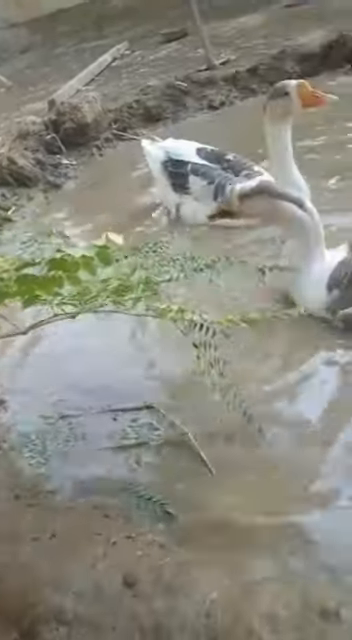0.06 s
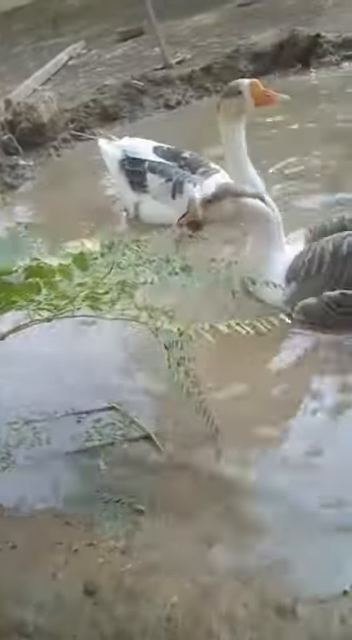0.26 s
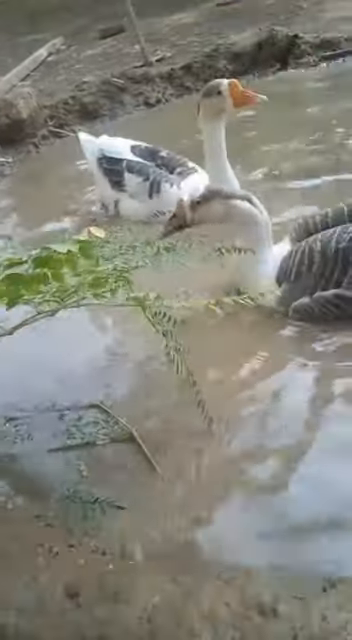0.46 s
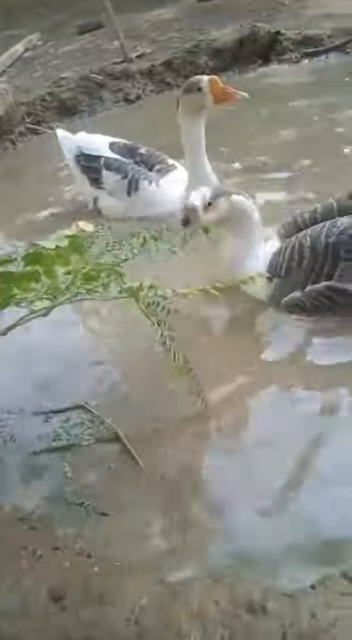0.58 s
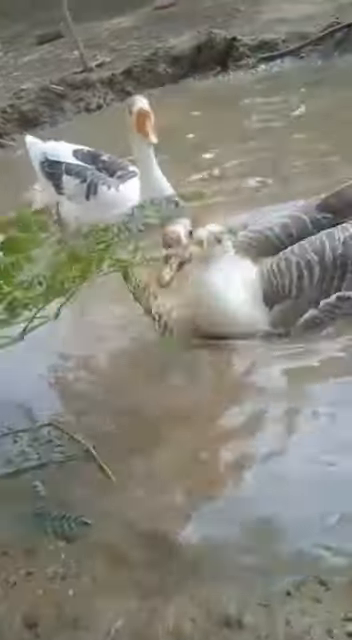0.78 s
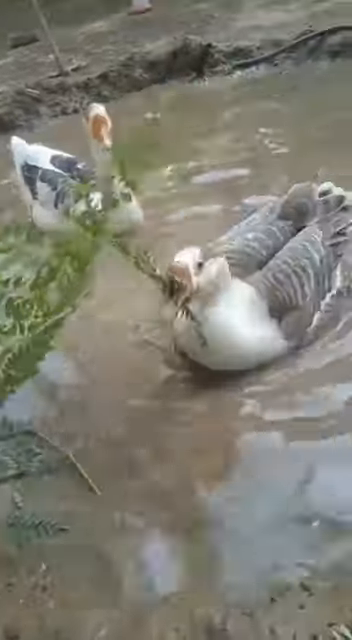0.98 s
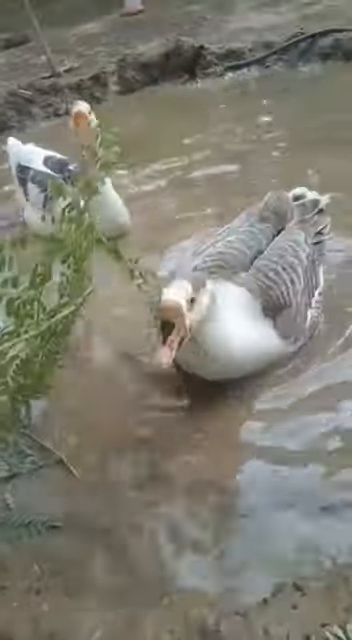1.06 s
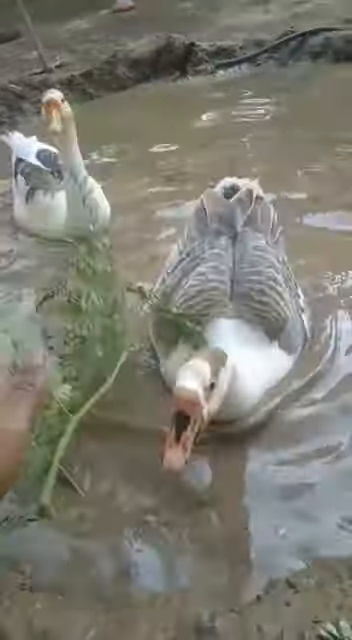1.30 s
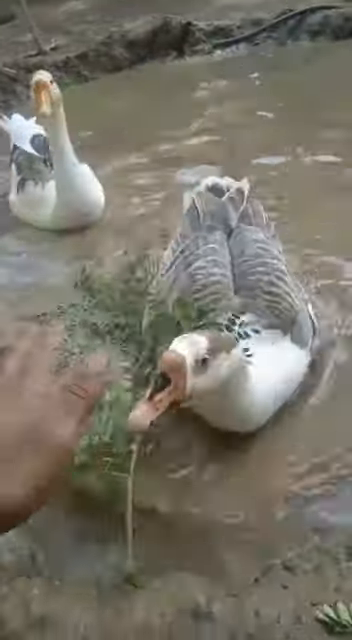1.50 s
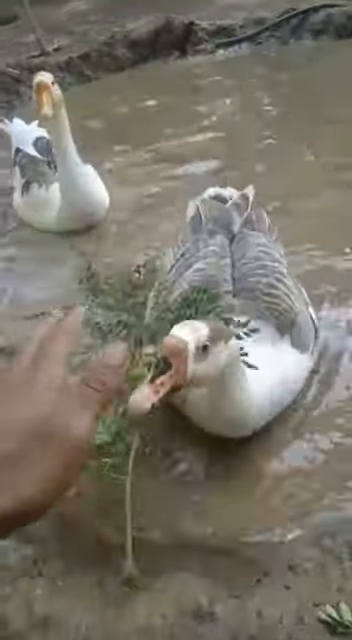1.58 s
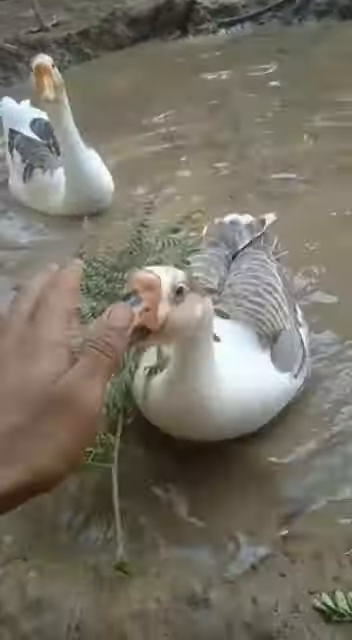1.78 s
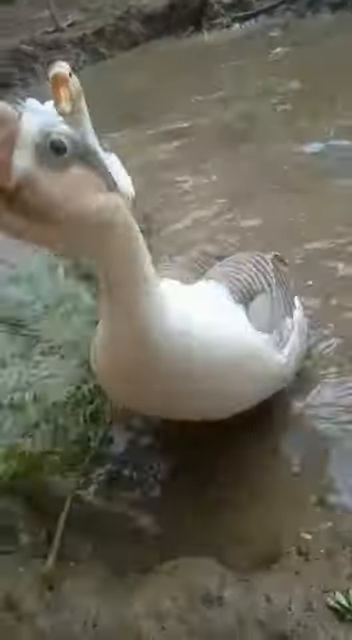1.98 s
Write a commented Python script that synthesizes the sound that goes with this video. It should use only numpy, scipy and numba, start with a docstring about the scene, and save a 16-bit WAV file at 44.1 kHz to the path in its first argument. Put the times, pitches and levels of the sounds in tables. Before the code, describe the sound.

A goose honks once, close and loud, from about 0.22 to 0.62 seconds: rattling onset, clear nasal note rising from roughly 880 to 1000 hertz, turning raspy, then dropping off. A soft grunt and leaf rustle precede it. Faint laps follow around 0.8 to 1.1, light leaf rustles to the end, twig ticks near 1.5 and 2.04. A distant engine rumbles under soft outdoor noise, with faint bank echo.

```python
"""A goose honks once, close by on a muddy pond: a rattling start, a clear nasal note that turns harsh, a short fall.
The note is a stack of harmonics with a beating second vibration and rasp; flaps ringing the throat add rattle.
A tugged leafy branch rustles and ticks in shaped noise; a soft grunt and low laps of the pond are resonant noise.
The banks echo faintly; behind lie a distant engine's wavering sine orders over a noise rumble, and soft,
flickering outdoor noise."""
import sys
import numpy as np
from scipy import signal
from scipy.fft import rfft, irfft
from scipy.io import wavfile
from scipy.ndimage import uniform_filter1d
from numba import njit

SR = 44100
rng = np.random.default_rng(int(sys.argv[2]) if len(sys.argv) > 2 else 0)


def put_to_file(sound):
    """Save the sound as 16-bit audio at rate SR, in the file named by the first command-line argument."""
    columns = np.atleast_2d(sound).T  # one column per channel
    safe = np.clip(columns, -1, 1)
    whole_steps = np.round(safe * 32767)
    wavfile.write(sys.argv[1], SR, whole_steps.astype(np.int16))


N = 90404

# Pitch of the honk. Each row: time in seconds, pitch in Hz.
HONK_PITCH = [(.23, 879), (.28, 850), (.305, 885), (.345, 885), (.357, 924), (.387, 973), (.41, 978),
              (.45, 968), (.478, 970), (.503, 1024), (.539, 1008), (.575, 975), (.595, 958), (.605, 915),
              (.616, 820)]
# Clear note. Each row: time in seconds, base level in dB, extra bass in dB, extra treble at full weight in dB.
NOTE_LEVELS = [(.22, -67, -16, -23), (.245, -63.5, -7, -5), (.27, -68.5, -1.5, -24), (.283, -56, 5.5, -29),
               (.305, -52, 3.5, -4), (.34, -49.5, -6.5, -23.5), (.362, -48.5, 1.5, -24.5),
               (.38, -41, -0.5, -23), (.40, -35.5, -1, -3), (.43, -38.5, 0.5, 3.5), (.475, -41, 2, -4),
               (.505, -35.5, -0.5, -5), (.54, -38.5, -3, -8.5), (.572, -43.5, 6, 9), (.594, -47.5, 2.5, 10),
               (.603, -57, 10, 16), (.614, -67.5, 12, -2)]
# Rattle bursts in the throat. Each row: start in seconds, length in seconds, flaps per second, level in dB,
# place of the strongest flap (0-1), fall away from it in dB, sway of the note (0-1).
RATTLE_BURSTS = [(0.236, 0.035, 180, -54.5, 0.86, 4.5, 0.4), (.2822, 0.041, 149, -47, 0.6, 3.5, 0.4),
                 (.4002, 0.032, 140, -48, 0.13, 4, 0.18), (.4675, 0.021, 162, -55.5, 1, 7, 0.14),
                 (.5028, 0.011, 170, -41, 0.23, 5.5, 0.48), (.5238, .04, 175, -46, 0.07, 8, 0.16)]


def undb(db):
    """Decibels to amplitude."""
    return 10 ** (np.asarray(db) / 20)


def unit(x):
    """Scale to rms 1."""
    return x / np.sqrt(np.mean(x ** 2))


def curve(rows, axis=1):
    """One column of a table, joined by straight lines in time."""
    rows = np.array(rows, float)
    return np.interp(np.arange(N) / SR, rows[:, 0], rows[:, axis])


def fade(rows):
    """Gate open from the first to the last row of a table, with 10 ms ramps outside."""
    t = np.arange(N) / SR
    inside_s = np.minimum(t - rows[0][0], rows[-1][0] - t)
    return np.clip(inside_s * 100 + 1, 0, 1)


def walk(steps_per_s):
    """Smooth random drift with spread near 1: held random steps, averaged twice."""
    step = max(int(SR / steps_per_s), 1)
    held = np.repeat(rng.standard_normal(N)[:N // step + 1], step)
    smooth = uniform_filter1d(uniform_filter1d(held, step), step)
    return 1.3 * smooth[:N]


def colour(x, points):
    """Shape a spectrum by (Hz, dB) points joined over log frequency; rms 1."""
    hz, db = np.array(points, float).T
    bin_hz = np.maximum(np.arange(N // 2 + 1) * SR / N, 1)
    gain = undb(np.interp(np.log(bin_hz), np.log(hz), db))
    return unit(irfft(rfft(x) * gain, N))


def turns(hz):
    """Running phase in radians."""
    return 2 * np.pi * np.cumsum(hz) / SR


def decay(x, time_s):
    """Start an exponential decay at each impulse."""
    return signal.lfilter([1], [1, -np.exp(-1 / (time_s * SR))], x)


@njit
def resonance(x, hz, width):
    """Band-pass state-variable filter with a moving centre; width in Hz."""
    out, band, low = np.empty(len(x)), 0., 0.
    for i in range(len(x)):
        g, damping = np.tan(np.pi * hz[i] / SR), width / hz[i]
        v = (band + g * (x[i] + 1e-18 - low)) / (1 + g * (g + damping))
        band = 2 * v - band
        low = low + 2 * g * v
        out[i] = damping * v
    return out


def ring(x, hz, stage_width_hz, order=3):
    """A steep resonance of cascaded band-passes; rms 1."""
    for _ in range(order):
        x = resonance(x, hz * np.ones(N), 1. * stage_width_hz)
    return unit(x)


def goose():
    """The harsher the voice, the less steady its pitch; flaps locked to the note sway it and ring the throat."""
    pitch_jitter, harsh_jitter = 0.0026, 0.012  # pitch shares; the second per unit of rasp over note
    # Air through the open bill. Each row: time in seconds, level in dB.
    rasp_rows = [(.35, -76.5), (.385, -62.5), (.41, -60.5), (.45, -69), (.48, -57), (.505, -53), (.54, -54),
                 (.57, -66), (.60, -59.5), (.615, -67.5)]
    note_level = undb(curve(NOTE_LEVELS))
    rasp_level = undb(curve(rasp_rows)) * fade(rasp_rows)
    harsh = np.minimum(rasp_level / note_level, .5)
    steady_pitch = curve(HONK_PITCH)
    pitch = steady_pitch * (1 + pitch_jitter * walk(300) + harsh_jitter * harsh * walk(900))
    phase = turns(pitch)
    clicks, sway = flaps(phase)
    voice = clear_note(note_level, pitch, phase) + second_vibration(note_level, pitch, phase)
    voice = voice * fade(NOTE_LEVELS)
    return (voice + rasp(rasp_level, phase)) * (1 + sway) + rattle(steady_pitch, clicks)


def clear_note(level, pitch, phase):
    """Shimmering harmonics coloured by the throat and by a bill resonance that rises and sinks."""
    harmonic_count, treble_hz, bill_sigma_hz, shimmer_db = 14, 3380, 444, 1.97
    # Throat colour of the harmonics. Each row: frequency in Hz, gain in dB.
    throat_colour = [(850, 5.5), (1000, -8), (1750, 4.5), (2000, 0), (2660, -12), (2900, -21), (3400, -33),
                     (3900, -18.5), (4850, -31.5), (5850, -46.5), (6900, -41.5), (7800, -41.5), (9000, -54),
                     (10300, -52.5), (12000, -52), (13800, -56)]
    # Bill resonance. Each row: time in seconds, centre in Hz, level in dB.
    bill_rows = [(.345, 5370, -74), (.375, 5860, -67.5), (.40, 6280, -57), (.43, 6140, -57),
                 (.465, 5720, -56.5), (.505, 6000, -70), (.535, 6100, -67.5), (.56, 5920, -58.5),
                 (.595, 5660, -50), (.61, 5670, -64)]
    colour_hz, colour_db = np.array(throat_colour, float).T
    bass_db, treble_db = curve(NOTE_LEVELS, axis=2), curve(NOTE_LEVELS, axis=3)
    bill_hz = curve(bill_rows)
    bill_level = undb(curve(bill_rows, axis=2)) * fade(bill_rows)
    note = 0
    for k in range(1, harmonic_count + 1):
        hz = k * pitch
        throat_db = np.interp(hz, colour_hz, colour_db)
        treble_weight = np.clip(2 * (hz / treble_hz - 1) + 0.32, 0, 1)
        extra_db = bass_db if k == 1 else treble_weight * treble_db
        bill = bill_level * np.exp(-.5 * ((hz - bill_hz) / bill_sigma_hz) ** 2)
        shimmer = undb(shimmer_db * np.sqrt(k / 2) * walk(89.0))
        note = note + (level * undb(throat_db + extra_db) + bill) * shimmer * np.sin(k * phase)
    return note


def second_vibration(level, pitch, phase):
    """A lower vibration beats with the note, placing side tones above or below its harmonics."""
    # Lower vibration. Each row: time in seconds, share of the pitch, depth in dB.
    second_rows = [(.35, .68, -16.5), (.385, .655, -9.5), (.415, .595, -16.5), (.475, .585, -11.5),
                   (.497, .665, -9), (.53, .675, -10), (.56, .69, -13), (.58, .78, -20), (.598, .79, -2)]
    # Each row: harmonic, side (+1 above, -1 below), level in dB.
    side_tones = [(0, 1, -3), (1, 1, -9.5), (2, 1, -6.5), (3, -1, -7), (3, 1, -24.5), (5, -1, -33.5),
                  (6, 1, -33)]
    lower_phase = turns(pitch * curve(second_rows) * (1 + 0.012 * walk(200)))
    beat = 0
    for k, side, db in side_tones:
        beat = beat + undb(db + 2.8 * walk(100.6)) * np.sin(k * phase + side * lower_phase)
    return level * undb(curve(second_rows, axis=2)) * fade(second_rows) * beat


def rasp(level, phase):
    """Turbulent air through the open bill, pulsing fully with each cycle of the note."""
    # Each row: frequency in Hz, spectral density in dB per Hz.
    rasp_colour = [(400, -47.5), (680, 2.5), (1400, -8), (2200, -4.5), (2700, -2.5), (3300, -11.5),
                   (4200, -5), (4700, -13), (5600, -3.5), (7000, -18.5), (8300, -34), (10300, -34),
                   (12000, -31.5), (13300, -33.5), (15000, -36)]
    pulsed_noise = rng.standard_normal(N) * (1 + np.cos(phase))
    return level * colour(pulsed_noise, rasp_colour)


def flaps(phase):
    """Runs of flaps that swell and fade, each let go by a cycle of the note: clicks and the note's sway."""
    release_cycles, scatter_db = .26, 1.8  # release point within the note's cycle
    sway_half_s, sway_lag_s = .0017, 0.0011
    t = np.arange(N) / SR
    releases = np.flatnonzero(np.diff(np.floor(phase / (2 * np.pi) - release_cycles)))
    clicks, sway = np.zeros(N), np.zeros(N)
    for start, length, rate, db, crest, fall_db, depth in RATTLE_BURSTS:
        for k, size in enumerate(rng.standard_normal(16)):
            age = k / rate
            if age >= length:
                break
            at = releases[np.argmin(np.abs(releases - (start + age) * SR))]
            off_crest = abs(age / length - crest) / max(crest, 1 - crest)
            clicks[at] += undb(db - fall_db * off_crest + scatter_db * size)
            u = ((t - at / SR - sway_lag_s) / sway_half_s) ** 2
            sway += depth * (1 - u) * np.exp(-u / 2)  # up just after the flap, down on either side
    return clicks, sway


def rattle(pitch, clicks):
    """Flaps and air puffs ring the throat, which tightens with pitch; a faint bill hiss trails each flap."""
    puff_s, puff_db, pitch_exponent = .0014, -7, 0.44
    hiss_s, hiss_hz, hiss_width_hz, hiss_db = .005, 5240, 1800, -21
    # Resonances at the highest pitch. Each row: centre in Hz, width per filter stage in Hz, level in dB.
    throat_rows = [(744, 246, -5), (1197, 180, -13.5), (2195, 446, 2), (2746, 210, -19.5)]
    puffs = unit(decay(clicks, puff_s) * rng.standard_normal(N))
    drive = unit(clicks) + undb(puff_db) * puffs
    tightness = (pitch / max(hz for _, hz in HONK_PITCH)) ** pitch_exponent
    bass, *upper = [undb(db) * ring(drive, hz * tightness, width) for hz, width, db in throat_rows]
    bass = bass * undb(curve(NOTE_LEVELS, axis=2))
    trail = decay(clicks, hiss_s) * rng.standard_normal(N)
    hiss = undb(hiss_db) * ring(trail, hiss_hz * tightness, hiss_width_hz)
    mean_period = SR / np.mean([row[2] for row in RATTLE_BURSTS])
    level = np.sqrt(np.mean(clicks ** 2) * mean_period)  # click size becomes rms over a flap period
    return unit(bass + sum(upper) + hiss) * level


def branch():
    """The tugged branch: swells of tiny leaf contacts and a few sharp twig ticks."""
    grain_db, largest_db = 2, 15
    tick_rise_s, tick_decay_s = 0.000067, 0.0014
    # Each row: centre in seconds, spread in seconds, level in dB.
    rustles = [(.053, 0.025, -71.5), (.676, 0.013, -70.5), (0.802, 0.012, -75.5), (1.154, .012, -69),
               (1.272, 0.028, -73.5), (1.37, 0.03, -74), (1.485, 0.038, -76), (1.628, 0.053, -77.5),
               (1.742, .014, -76), (1.874, 0.02, -72.5), (1.975, 0.013, -73)]
    # Each row: time in seconds, level in dB.
    tick_rows = [(1.458, -62), (1.483, -60), (1.508, -57.5), (1.569, -64), (1.61, -67), (2.0351, -51),
                 (2.0364, -47.5)]
    # Leaf and tick spectra. Each row: frequency in Hz, density in dB per Hz.
    leaf_colour = [(500, -25), (1800, 5.5), (3200, 0.5), (4500, -2.5), (7000, -8), (8500, -14),
                   (13500, -21), (15000, -11)]
    tick_colour = [(800, -33), (2300, 9.5), (3000, -22), (4000, 7.5), (7000, -0.5), (9500, 1), (12500, -25),
                   (15500, 5.5)]
    t = np.arange(N) / SR
    contact_db = np.minimum(grain_db * rng.exponential(size=N), largest_db)
    grains = colour(rng.standard_normal(N) * undb(contact_db), leaf_colour)
    swell = sum(undb(db) * np.exp(-.5 * ((t - at) / spread) ** 2) for at, spread, db in rustles)
    snaps = 0
    for at, db in tick_rows:
        snaps = snaps + undb(db) * np.exp(np.minimum((t - at) / tick_rise_s, (at - t) / tick_decay_s))
    return grains * swell * undb(2 * walk(150)) + snaps * colour(rng.standard_normal(N), tick_colour)


def grunt_and_laps():
    """A soft goose grunt at the start, then soft low laps of the pond: brief swells of resonant noise."""
    # Each row: centre in seconds, spread in seconds, resonance in Hz, width per filter stage in Hz, level in dB.
    blip_rows = [(.045, 0.014, 1720, 510, -62.5), (0.786, .029, 867, 170, -65.5),
                 (0.957, 0.042, 835, 148, -69), (1.116, 0.026, 884, 150, -70)]
    t = np.arange(N) / SR
    blips = 0
    for at, spread, hz, width, db in blip_rows:
        swell = undb(db) * np.exp(-.5 * ((t - at) / spread) ** 2)
        blips = blips + swell * ring(rng.standard_normal(N), hz, width)
    return blips


def banks(x):
    """Faint, short scatter from the pond's banks: convolution with delayed, decaying noise."""
    level_db, t60_s, delay_s = -24.5, 0.39, 0.018
    # Echo spectrum. Each row: frequency in Hz, gain in dB.
    bank_colour = [(300, -9.5), (900, -4.5), (1700, -9), (1980, -1), (2250, -10.5), (4000, -5),
                   (5800, -5.5), (14000, -8.5)]
    t = np.arange(N) / SR
    tail = colour(rng.standard_normal(N), bank_colour) * undb(-60 * t / t60_s) * (t > delay_s)
    tail = tail / np.sqrt(np.sum(tail ** 2))
    return undb(level_db) * signal.fftconvolve(x, tail)[:N]


def engine():
    """Distant engine: orders of a slightly drifting firing rate waver in level over a low rumble."""
    firing_hz, drift_share, hum_db, waver_db = 37.24, 0.003645, -57, 5
    # Each row: multiple of the firing rate, relative level in dB.
    orders = [(2, -17), (3, 1), (4, -18), (5, -11), (6, -10.5), (7, -11.5), (8, -8), (9, -7), (10, -4.5),
              (11, -15)]
    # Rumble spectrum. Each row: frequency in Hz, density in dB per Hz.
    rumble_colour = [(20, -35), (35, -14), (55, -7), (80, 4), (110, 1.5), (150, -3), (250, -1), (360, 2),
                     (430, -12), (520, -44), (900, -71)]
    # Each row: time in seconds, rumble level in dB.
    rumble_levels = [(0, -62), (.25, -55.5), (.6, -56.5), (.87, -58), (1.1, -62), (1.5, -59), (2.05, -63)]
    phase = turns(firing_hz * (1 + drift_share * walk(4.023)))
    hum = 0
    for k, db in orders:
        level = undb(db + waver_db * walk(7.15))
        hum = hum + level * np.sin(k * phase + rng.uniform(0, 2 * np.pi))
    rumble = undb(curve(rumble_levels)) * colour(rng.standard_normal(N), rumble_colour)
    return undb(hum_db) * unit(hum) + rumble


def air():
    """Soft outdoor noise that flickers a little in level."""
    level_db, flicker_db = -64, 1.33
    # Each row: frequency in Hz, density in dB per Hz.
    air_colour = [(30, -14.5), (200, 5.5), (500, -1), (880, 1), (1200, -3.5), (1700, 0), (2500, -14.5),
                  (3150, -10), (3700, -19.5), (7000, -20), (8500, -32), (13500, -35), (15000, -22.5)]
    return undb(level_db + flicker_db * walk(24.67)) * colour(rng.standard_normal(N), air_colour)


def scene():
    """Goose, branch, grunt and laps close by, echoed by the banks; engine and air far off."""
    near = goose() + branch() + grunt_and_laps()
    return (near + banks(near) + engine() + air())[None]


def record(dry):
    """A steep elliptic low-pass cuts the top."""
    top_hz, ripple_db, stop_db = 15600, .2, 70
    low_pass = signal.ellip(10, ripple_db, stop_db, top_hz, fs=SR, output="sos")
    return signal.sosfilt(low_pass, dry)


dry = scene()
out = record(dry)
put_to_file(out)
```